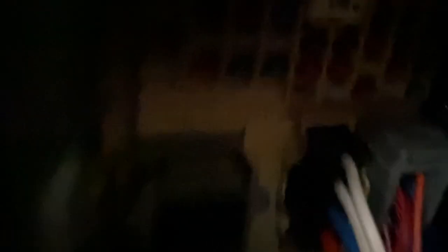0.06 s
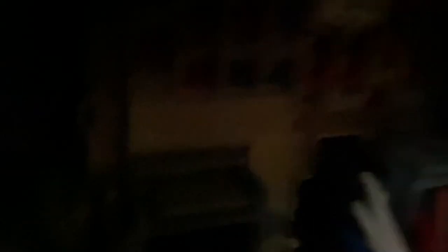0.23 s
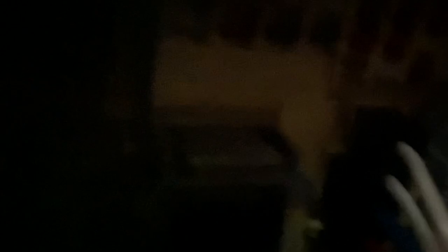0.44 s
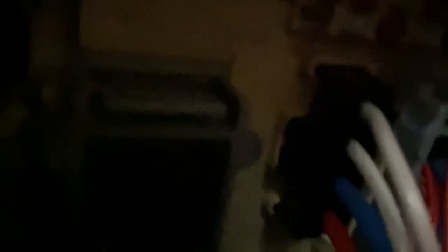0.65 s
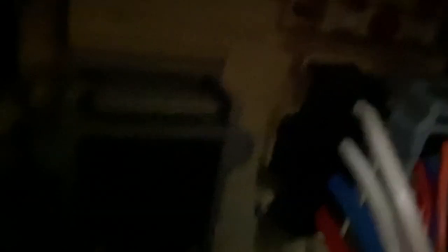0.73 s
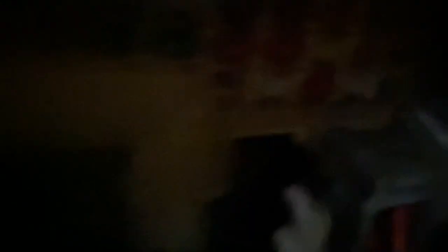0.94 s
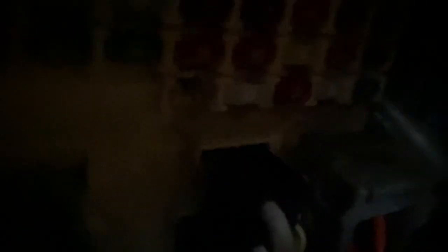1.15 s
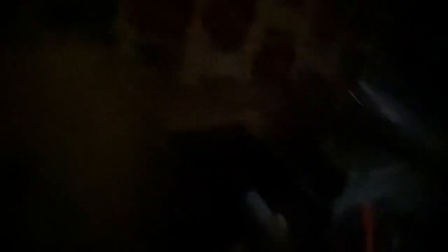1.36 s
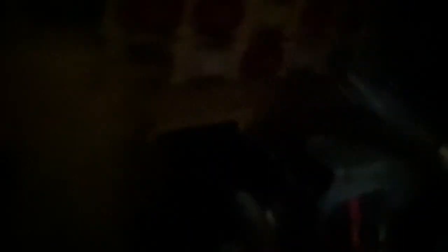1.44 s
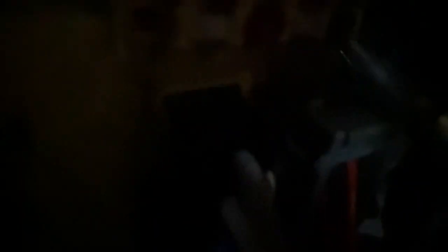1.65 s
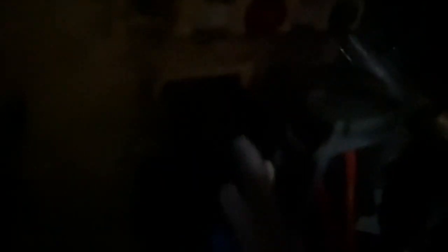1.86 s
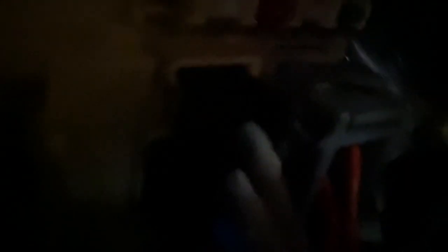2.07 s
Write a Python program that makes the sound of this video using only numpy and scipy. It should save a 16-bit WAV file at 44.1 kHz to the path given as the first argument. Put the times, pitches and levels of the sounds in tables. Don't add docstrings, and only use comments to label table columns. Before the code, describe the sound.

Close, dry, rapid clicking of a relay, about twenty-one hard bright ticks a second, runs without pause; near the start the handheld microphone bumps the trim once, with quiet engine hum and rumble beneath.

```python
import sys
import numpy as np
from scipy import signal
from scipy.fft import rfft, irfft, next_fast_len
from scipy.io import wavfile
from scipy.ndimage import uniform_filter1d, map_coordinates

SR = 44100
rng = np.random.default_rng(int(sys.argv[2]) if len(sys.argv) > 2 else 0)


def wrap_up_sound(samples):
    columns = np.atleast_2d(samples).T
    tamed = np.clip(columns, -1, 1)
    steps = np.round(tamed * 32767).astype(np.int16)
    wavfile.write(sys.argv[1], SR, steps)


def rack_gain(trim_db):
    fader = np.asarray(trim_db, float)
    return 10 ** (fader / 20)


N = 92610

# time_s, level_db
AIR_LEVEL = [(0.0, -49), (0.16, -48), (0.37, -50.5), (0.5, -55.5), (0.7, -57.5), (1.91, -61), (2.1, -58)]
# frequency_hz, density_db
AIR_COLOUR = [(76, -13.5), (130, -9.5), (450, -22.5), (1200, -27), (2200, -27.5), (4000, -43.5)]
# frequency_hz, density_db
HISS_COLOUR = [(2500, -8), (3800, 5), (5200, 0), (8000, -6.5), (8900, -14), (11500, -7), (13300, -22),
               (15300, -18), (16000, -50)]
# frequency_hz, correlation (no unit)
AIR_ALIKE = [(100, 0.71), (500, 0.14), (3000, 0.21), (12000, 0.56)]
# frequency_hz, density_db
RUMBLE_COLOUR = [(20, -38), (40, -8), (55, 8), (70, 10.5), (110, 14.5), (160, -31)]
# time_s, level_db
HUM_LEVEL = [(0, -58), (.07, -54), (.3, -47), (.45, -50.5), (.71, -53.5), (.75, -68), (.85, -53.5),
             (.9, -64.5), (1.08, -52.5), (1.27, -49.5), (1.32, -63.5), (1.4, -51.5), (1.54, -53.5),
             (1.59, -64), (1.67, -51), (2.1, -53.5)]
# time_s, level_db
DRONE_LEVEL = [(0.0, -51), (0.12, -61), (0.27, -42), (0.3, -48), (0.41, -60), (0.45, -65), (0.95, -58),
               (1.17, -74), (1.36, -52), (1.4, -67), (1.63, -54), (2.1, -59)]

# start_s, peak_db
FIRST_SLAM = (0.0024, -25)
# start_s, peak_db
SLAMS_FAR = [(0.046, -25), (0.093, -26.5), (0.1406, -24), (0.1854, -25), (0.2343, -23), (0.28, -24),
             (0.3262, -24.5), (0.372, -23.5), (0.4193, -23.5), (0.4642, -22.5), (0.5085, -22),
             (0.5567, -20.5), (0.602, -20), (0.6492, -19.5), (0.6987, -20), (0.7471, -21.0), (0.7938, -20),
             (0.8434, -19.5), (0.8909, -20.5), (0.9388, -20.0), (0.9855, -21)]
# start_s, peak_db
SLAMS_NEAR = [(1.0328, -21.0), (1.0772, -20.5), (1.1248, -21), (1.17, -20.5), (1.2157, -20.5), (1.284, -19),
              (1.329, -19.5), (1.376, -21), (1.4186, -19.0), (1.4642, -20), (1.532, -19), (1.5792, -20.5),
              (1.625, -20.5), (1.6699, -19.5), (1.7151, -19), (1.7623, -19.5), (1.8086, -20.5),
              (1.8546, -20), (1.9198, -20), (1.9668, -20), (2.014, -20.0), (2.059, -20.5)]
# delay_after_slam_ms, level_db
CONTACTS = [
    (-3, -9.5),
    (-2, -13.5),
    (-3.25, -17.5),
    (1.105, -3.5),
    (1.325, -2),
    (2.5, 0.16),
    (3, -5),
    (4, -9),
    (5.5, -11),
]
# pitch_hz, level_db, t60_s, left_over_right_db, left_lead_rad
HOUSING_MODES = [(705, -21.0, 0.026, 3.5, 3), (1064, -17, 0.032, 24, 0.7), (1688, -22.5, 0.025, -5, 2.5),
                 (2406, -15, 0.02, -3, 0.2), (2565, -6.5, 0.021, 4.5, 0.84), (3158, -17.5, 0.028, 14, 1.6),
                 (3280, -10, 0.024, 3, 0.5), (3925, -8.5, 0.012, 3, 0.2), (4205, -7.0, 0.017, 1.0, 0.47),
                 (4656, 2.0, 0.014, 12.0, -0.06), (5294, -5.5, 0.015, 2, -1.2),
                 (6176, -7.5, 0.012, 7, -2.3), (6550, -24, 0.018, -8, -1.5), (7430, -9, 0.012, 4.5, -1.5)]
# pitch_hz, level_db, t60_s, left_over_right_db, left_lead_rad
SPRING_MODES = [(8140, -11.5, 0.015, -0.5, -2.3), (8710, -5.5, 0.009, -1, -3), (9370, -5, 0.0085, 2.5, 3),
                (9620, -2, 0.011, 1, 2.5), (10100, -22, 0.0098, -3, 1.2), (10903, 1.0, 0.0065, 1.5, 0.49),
                (11460, 1, 0.0076, 1, -1.3), (12030, 0.5, 0.0087, -0.5, -1.5),
                (12800, -7.0, 0.008, 3, -3.5), (13300.0, -12.0, 0.0091, -6, -2.5),
                (14400, -16, 0.007, -3, 8), (14900, -13.5, 0.0085, 3, 2.5), (15400, -15, 0.011, 0.0, 0.5)]
# pitch_hz, far_shift_db, midway_shift_db, far_left_over_right_db, midway_left_over_right_db
APPROACH = [(690.0, -3, -2.0, 1, -1), (1070.0, 11.5, 6, 12, 11), (1700.0, 14, 4, -5, -4),
            (2380.0, -0.5, -8.5, 1, -4.0), (2550.0, 3.5, -2.0, 1, 4), (3170.0, 2, -15, 10, 11.0),
            (3270.0, -8, -5, 8.0, 7), (3850.0, 2, -15, 7.0, 1.0), (4170.0, 3.5, 2.5, 4, -3),
            (4705.0, -1.5, 0.5, 9, 11), (5360.0, 0.5, -2.5, 2, 5.5), (6150.0, 5.5, 2.5, 7, 5.5),
            (6600.0, 16, 1, 5.0, 0), (7400.0, 3, -3, 2.0, 5), (8000.0, 1, -18, -6, -1),
            (8780.0, 6.0, -3, 0, 0.0), (9310.0, 2, -9.5, 1.5, -4), (9650.0, -1, 1, -6, 3.5),
            (10130.0, 18, 20, -1.0, 6), (10820.0, 2.5, -0.5, 3, -8), (11400.0, -12, 0, -1.0, 1.0),
            (12140.0, -0.5, -6.5, -2, 2), (12730.0, -1, -5, -6, -10), (13300.0, 3, -8.0, 2, -2),
            (14500.0, -6, -10, -4.0, 2.0), (15000.0, 7, -4, -1.0, 1.0), (15550.0, -4.0, 0, 1.0, 3)]
STATIONS_S = [0.14, 0.63, 1.07]
# frequency_hz, gain_db
FAR_TREBLE = [(15600, 0), (15900, -30)]
# frequency_hz, gain_db
BOX_COLOUR = [(500, -29), (1000, 11), (1900, -24), (3000, -4), (5000, 6.5), (8000, 3), (13500, -3),
              (16000, -26)]

# start_s, level_db, upper_modes_db
KNOCKS = [
    (.2288, -28, -21),
    (0.2351, -16.5, 8.5),
    (0.2384, -10, -38),
    (0.2567, -23.5, 5.5),
    (0.2642, -21.5, -8),
    (0.2743, -25.5, -9),
    (.299, -30, -7.5),
    (.359, -32.5, -12),
    (.369, -48.5, 2),
]
# pitch_hz, level_db, t60_s, left_over_right_db, left_lead_rad
PANEL_MODES = [(123, -27, 0.13, -1, 0.16), (156, -11, 0.058, -2, -0.083), (188.5, -0.5, 0.074, 1, -0.14),
               (218, -3, 0.07, 5, 0.092), (252, -5.5, 0.044, -1, -0.14), (327.3, -4.5, 0.0633, 2.5, 0.9),
               (486.5, -15.5, 0.11, -7, 0.99)]
# pitch_hz, level_db, t60_s, left_over_right_db, left_lead_rad
TRIM_MODES = [(696, -10.5, 0.061, -11.5, 3.5), (900, -5, 0.025, 14, -1.5), (1260, -6, .02, 7.5, 1.5),
              (1704, -8, 0.023, 1.5, 1.27), (2054, -11, 0.017, 2, 1), (2756, -8, 0.009, 3, 1.5),
              (3120, -4, 0.0074, 10.5, 2), (3850, -16, 0.0053, 1, 2), (4640, -22, 0.0093, -3, 4)]
# frequency_hz, gain_db
CRACK_COLOUR = [(300, -20), (900, 6), (3000, 7), (4500, -15), (7000, -35)]
# frequency_hz, limit_db
GATE_LIMIT = [(1500, -125), (3000, -101), (5000, -96), (7500, -93), (9000, -89), (12000, -92), (14000, -88),
              (17000, -84)]

HUM_START_HZ, HUM_HZ, HUM_RISE_S = 90.9, 108.1, 0.4
DRONE_HZ, DRONE_DB, RUMBLE_DB = 56.3, -2, -60.5
PITCH_WANDER = 0.0203
HISS_DB, HISS_GROWS = -5.5, 1.74
SCATTER_US, SCATTER_DB = 18, 1.6
RING_DB, RISE_MS = -10, 0.25
SPRING_DB, SPRING_PAN_DB = 2.5, -3
ONE_PATH_HZ, LEFT_LAG_MS, LEFT_TURN_RAD = 7600, 0.237, -2.3
BOX_DB, BOX_T60_S, LATE_DB, LATE_T60_S = -2.5, 0.026, -16.5, 0.067
PUSH_MS = 1.13
PANEL_FROM_HZ = 125
CRACK_DB, CRACK_T60_S = 8.5, 0.016
CABIN_DB, CABIN_T60_S = -15.5, 0.24
WHINE_HZ, WHINE_DB, WHINE_FROM_S, WHINE_PAN_DB = 3347, -68, 0.42, 7
GATE_SWAY_DB, TOP_HZ = 4, 16600


def unit(x):
    return x / np.sqrt(np.mean(x ** 2) + 1e-20)


def along(points, hz):
    f, v = np.transpose(points)
    return np.interp(np.log(hz + 1), np.log(f + 1), v)


def curve(rows):
    return np.interp(np.arange(N) / SR, *np.transpose(rows))


def wobble(rate):
    knots = rng.standard_normal(int(N * rate / SR) + 4)
    return map_coordinates(knots, [np.arange(N) * rate / SR])


def filtered(x, response):
    m = next_fast_len(x.shape[-1] + 8192)
    spectrum = rfft(x, m) * response(np.fft.rfftfreq(m, 1 / SR))
    return irfft(spectrum, m)[..., :x.shape[-1]]


def rush(spectrum, alike):
    def mid_side(hz):
        turn = np.arccos(np.clip(along(alike, hz), -1, 1)) / 2
        return rack_gain(along(spectrum, hz)) * [np.cos(turn), np.sin(turn)]
    mid, side = filtered(rng.standard_normal((2, N)), mid_side)
    return unit(np.array([mid + side, mid - side]))


def wandering_tone(hz):
    pitch = hz * (1 + PITCH_WANDER * wobble(8))
    return np.sqrt(2) * np.sin(2 * np.pi * np.cumsum(pitch) / SR)


def ringing(modes):
    t = np.arange(SR // 3) / SR
    side = np.array([[.5], [-.5]])
    rise = 1 - np.exp(-t * 1000 / RISE_MS)
    total = 0
    for hz, db, t60, pan, lead in modes:
        decay = rack_gain(db + side * pan - 60 * t / t60)
        total = total + decay * np.sin(2 * np.pi * hz * t + side * lead)
    return rise * total


def struck(blows, answer):
    return signal.fftconvolve(blows[None], answer, axes=1)[:, :N]


def dying(t60):
    t = np.arange(SR // 3) / SR
    tail = rng.standard_normal((2, SR // 3)) * rack_gain(-60 * t / t60)
    return tail / np.linalg.norm(tail[0])


def air():
    air_db = curve(AIR_LEVEL)
    body = rack_gain(air_db + 2.9 * wobble(12.29)) * rush(AIR_COLOUR, AIR_ALIKE)
    hiss_db = air_db[0] + HISS_DB + HISS_GROWS * (air_db - air_db[0])
    hiss = rack_gain(hiss_db + 3.5 * wobble(40.0)) * rush(HISS_COLOUR, AIR_ALIKE)
    return body + hiss


def rumble():
    return rack_gain(RUMBLE_DB + 1.14 * wobble(5.1)) * rush(RUMBLE_COLOUR, [(50, 0.77)])


def hum():
    t = np.arange(N) / SR
    hz = np.where(t < HUM_RISE_S, HUM_START_HZ, HUM_HZ)
    return rack_gain(curve(HUM_LEVEL) + 0.97 * wobble(24.26)) * wandering_tone(hz)


def drone():
    return rack_gain(DRONE_DB + curve(DRONE_LEVEL) + 1.2 * wobble(6.9)) * wandering_tone(DRONE_HZ)


def box():
    right, left = dying(BOX_T60_S) + rack_gain(LATE_DB) * dying(LATE_T60_S)

    def late(hz):
        phase = LEFT_TURN_RAD - 2 * np.pi * hz * LEFT_LAG_MS / 1000
        return (hz > ONE_PATH_HZ) * np.exp(1j * phase)
    left = filtered(left, lambda hz: hz <= ONE_PATH_HZ) + filtered(right, late)
    return filtered(np.array([left, right]), lambda hz: rack_gain(BOX_DB + along(BOX_COLOUR, hz)))


def relay():
    s, db = np.transpose([FIRST_SLAM, *SLAMS_FAR, *SLAMS_NEAR])
    ms, step_db = np.transpose(CONTACTS)
    chance = rng.standard_normal((len(s), len(ms), 2))
    at = (s[:, None] + ms / 1000 + chance[..., 0] * SCATTER_US / 1e6) * SR
    size = rack_gain(db[:, None] + step_db + SCATTER_DB * chance[..., 1]) * (at >= 0)
    blows = np.bincount(np.clip(at, 0, N - 1).astype(int).ravel(), size.ravel(), N)

    hz, near_db, t60, near_pan, lead = np.transpose([*HOUSING_MODES, *SPRING_MODES])
    spring = hz > ONE_PATH_HZ
    _, far_db, midway_db, far_pan, midway_pan = np.transpose(APPROACH)
    answers = []
    for shift_db, pan in [(far_db, far_pan), (midway_db, midway_pan), (0, near_pan)]:
        mode_db = near_db + shift_db + SPRING_DB * spring
        modes = zip(hz, mode_db, t60, pan + SPRING_PAN_DB * spring, lead)
        answers.append(rack_gain(RING_DB) * ringing(modes) + box())
    answers[0] = filtered(answers[0], lambda f: rack_gain(along(FAR_TREBLE, f)))

    shares = [np.interp(np.arange(N) / SR, STATIONS_S, row) for row in np.eye(len(answers))]
    return sum(struck(blows * share, answer) for share, answer in zip(shares, answers))


def knock():
    s, db, sharp_db = np.transpose(KNOCKS)
    at = (s * SR).astype(int)
    offset_ms = np.arange(-200, 200) / SR * 1000
    push = np.exp(-.5 * (4 * offset_ms / PUSH_MS) ** 2)
    soft = np.convolve(np.bincount(at, rack_gain(db), N), push / push.sum(), "same")
    sharp = np.bincount(at, rack_gain(db + sharp_db), N)
    crack = filtered(dying(CRACK_T60_S), lambda hz: rack_gain(CRACK_DB + along(CRACK_COLOUR, hz)))
    both = struck(soft, ringing(PANEL_MODES)) + struck(sharp, ringing(TRIM_MODES) + crack)
    both = both + rack_gain(CABIN_DB) * struck(both.mean(0), dying(CABIN_T60_S)[:1])
    return signal.sosfilt(signal.butter(3, PANEL_FROM_HZ, "high", fs=SR, output="sos"), both)


def whine():
    t = np.arange(N) / SR
    fade_in = np.clip((t - WHINE_FROM_S) / 0.059, 0, 1)
    tone = np.sin(2 * np.pi * WHINE_HZ * t + 0.6 * wobble(31.2))
    return rack_gain(WHINE_DB + 1.4 * wobble(15.3)) * fade_in * tone * rack_gain([[WHINE_PAN_DB], [-WHINE_PAN_DB]])


def scene():
    return air() + rumble() + hum() + drone() + relay() + knock() + whine()


def gated(x):
    hz, t, z = signal.stft(x, SR, nperseg=256)
    power = (abs(z[:, :-1]) ** 2).mean(0).reshape(32, 4, -1).mean(1)
    sway = rng.standard_normal((32, len(t) // 5 + 1))
    sway_db = GATE_SWAY_DB * np.repeat(sway, 5, axis=1)[:, :len(t)]
    level = np.repeat(uniform_filter1d(power, size=3, axis=1) * rack_gain(2 * sway_db), 4, axis=0)
    is_open = level > rack_gain(along(GATE_LIMIT, hz[:-1]))[:, None] ** 2
    z = z * np.vstack([is_open, 0 * level[:1]])
    return signal.istft(z, SR, nperseg=256)[1][:, :N]


def roll_off(x):
    return signal.sosfilt(signal.butter(12, 17010, fs=SR, output="sos"), x)


def record(dry):
    quiet = gated(filtered(dry, lambda hz: hz < TOP_HZ))
    return roll_off(quiet)


dry = scene()
out = record(dry)
wrap_up_sound(out)
```